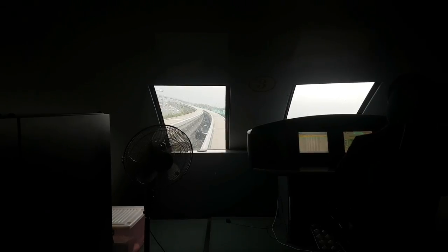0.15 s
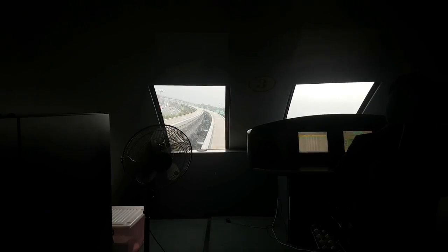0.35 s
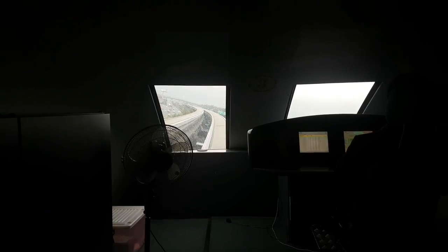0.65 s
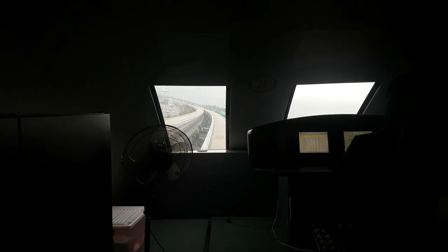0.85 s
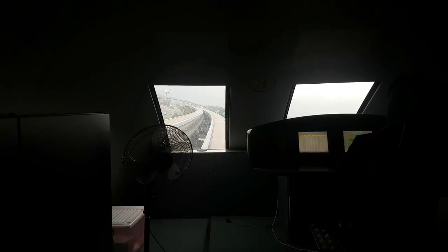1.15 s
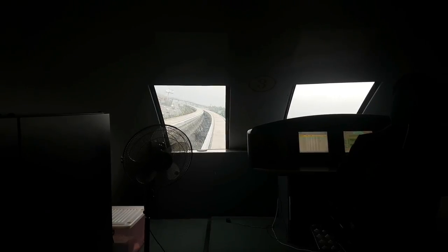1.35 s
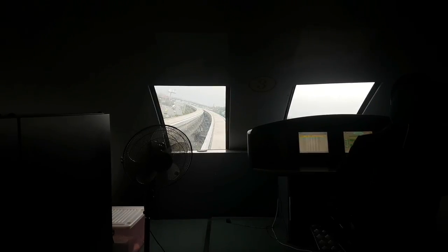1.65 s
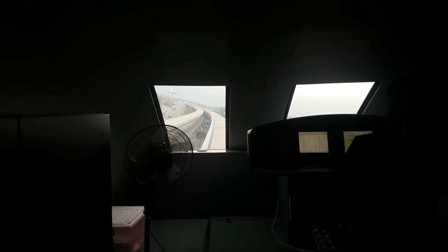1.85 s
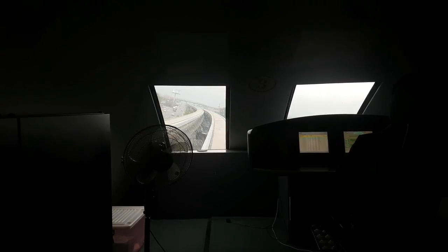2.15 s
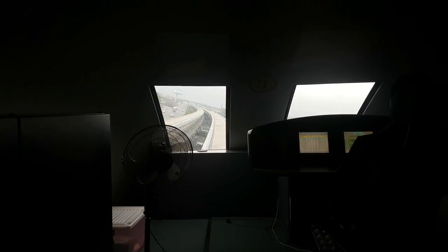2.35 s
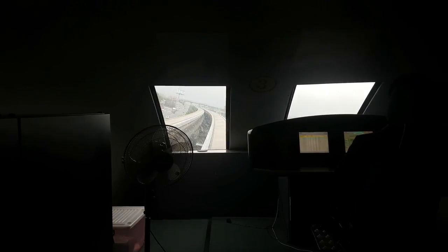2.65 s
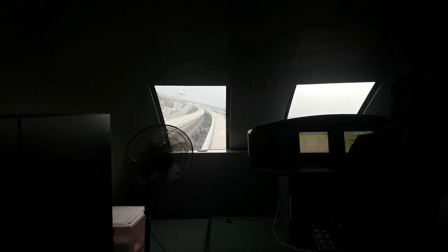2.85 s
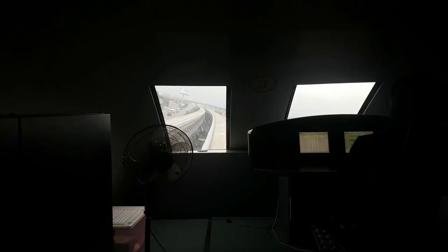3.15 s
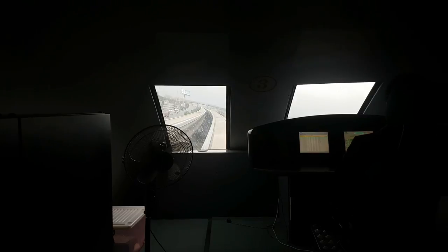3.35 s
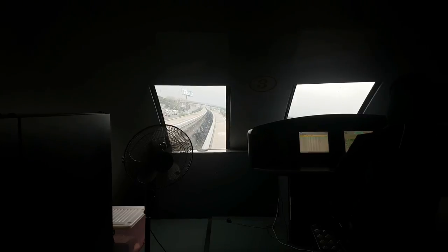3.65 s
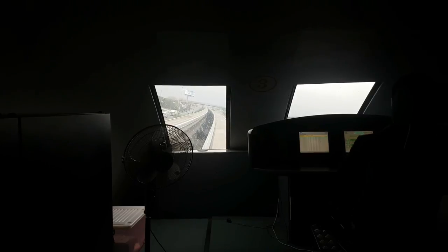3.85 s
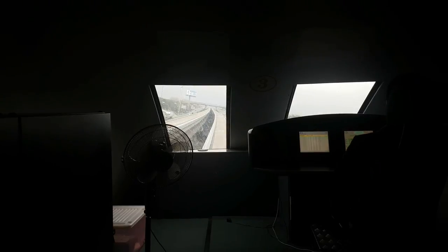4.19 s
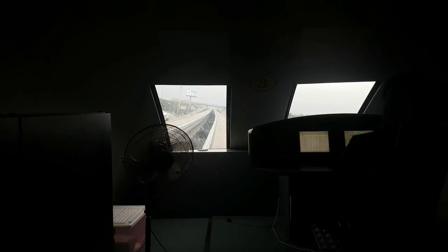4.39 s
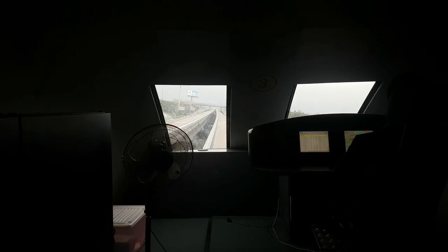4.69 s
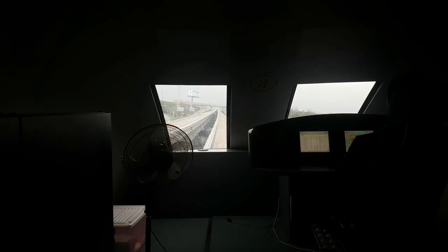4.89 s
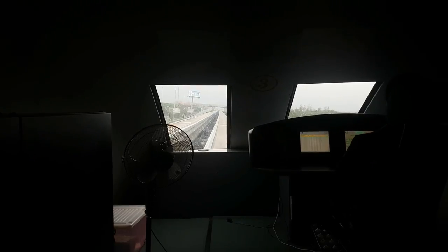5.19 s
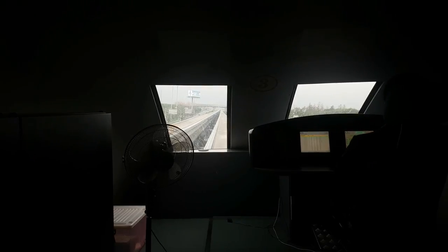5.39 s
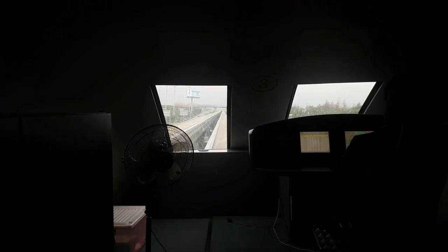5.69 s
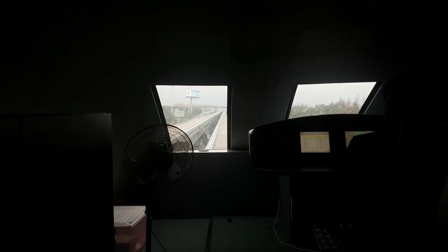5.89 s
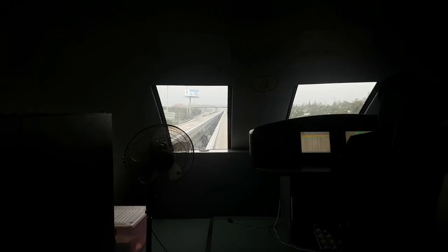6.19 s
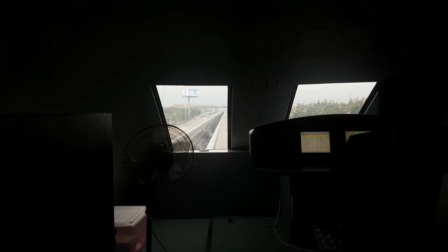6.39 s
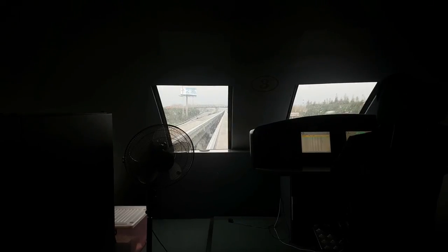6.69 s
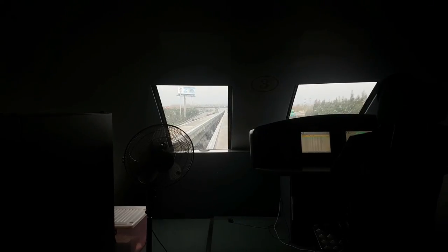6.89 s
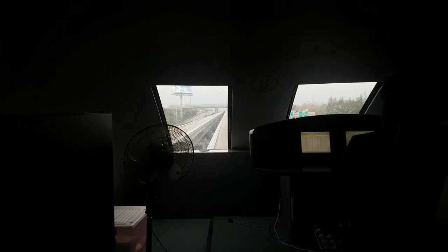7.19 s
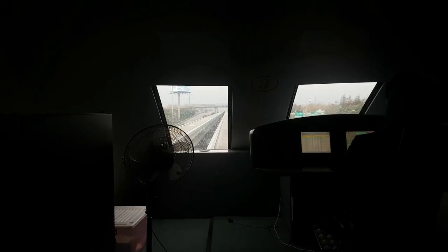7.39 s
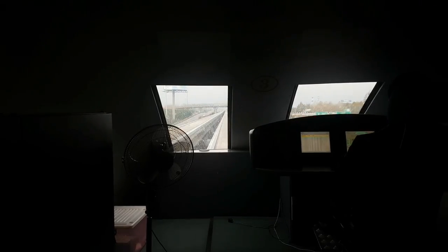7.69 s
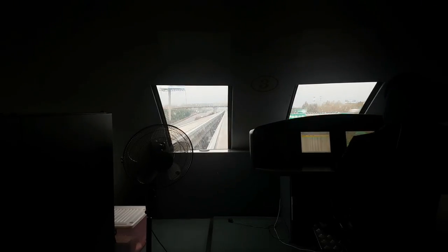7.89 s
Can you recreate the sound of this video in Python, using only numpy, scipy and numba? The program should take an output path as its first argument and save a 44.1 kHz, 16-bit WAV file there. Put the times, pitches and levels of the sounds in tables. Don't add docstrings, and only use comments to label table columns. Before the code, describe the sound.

Inside a high-speed train's driver cab, a deep booming roar sways with gusts while airy hiss and a thin tonal whine come and go.

```python
import sys
import numpy as np
from scipy import signal
from scipy.fft import rfft, irfft, next_fast_len
from scipy.io import wavfile
from scipy.ndimage import uniform_filter1d
from numba import njit

SR = 44100
rng = np.random.default_rng(int(sys.argv[2]) if len(sys.argv) > 2 else 0)


def generate_wav(sig):
    pcm = np.round(np.clip(np.atleast_2d(sig).T, -1, 1) * 32767).astype(np.int16)
    wavfile.write(sys.argv[1], SR, pcm)


def gain_from_decibels(decibels):
    exponent = np.asarray(decibels, float) / 20
    return 10 ** exponent


N = 354563
TIME = np.arange(N) / SR
SIZE = next_fast_len(N)
HZ = np.maximum(np.arange(SIZE // 2 + 1) * SR / SIZE, 1)


def shape(points, beyond=None):
    hz, value = np.transpose(points)
    return np.interp(np.log(HZ), np.log(hz), value, beyond, beyond)


def walk(rate_hz):
    k = int(SR / rate_hz)
    steps = np.repeat(rng.standard_normal(N // k + 1), k)
    return 0.72 * uniform_filter1d(uniform_filter1d(steps, k), k)[:N]


def bumps(centre_s, length_s, height):
    return height @ np.exp(-(2 * (TIME - centre_s[:, None]) / length_s[:, None]) ** 2)


def body(cab):
    # f/Hz, density/dB per Hz
    boom_colour = [(18, -27), (44, -17), (73, -10.5), (89, -2.5), (130, -3), (200, -3.5), (250, -5.5),
                   (290, -8), (330, -15), (420, -30), (700, -70)]
    # f/Hz, density/dB per Hz
    panel_colour = [(150, -48), (220, -26.5), (320, -1.5), (450, -2), (600, -6.5), (800, -11.5),
                    (1000, -16.5), (1400, -56), (2500, -73.5)]
    # f/Hz, likeness/0-1
    alike = [(25, .95), (60, .96), (130, .985), (215, .98), (300, .93), (390, .6), (480, .6), (560, .4),
             (650, .2), (800, .1), (1200, 0)]
    likeness = shape(alike)
    gust_db, shake_db = sway()
    slots_per_beam, joint_db, joint_turns = 288, 0.2, 0.33
    beams = np.cumsum(slot_hz()) / SR / slots_per_beam
    throb_db = joint_db * np.cos(2 * np.pi * (beams - joint_turns))
    boom_db = -15 + shake_db + throb_db
    panel_db = -23.5 + 0.97 * gust_db + 0.9 * walk(7) + 0.37 * walk(4.9)
    booms = field(boom_colour, likeness, 0.18, cab) * gain_from_decibels(boom_db)
    panels = field(panel_colour, likeness, 0.11, cab) * gain_from_decibels(panel_db)
    return booms + panels


def air(cab):
    # f/Hz, density/dB per Hz
    rush_colour = [(300, -50), (500, -20), (800, -6), (1080, -.6), (1500, -1.2), (2100, -3.6), (2540, -5),
                   (2690, -7.3), (3500, -8.6), (4000, -11.7), (4300, -15.5), (5500, -22.5), (8000, -33.5),
                   (9000, -48)]
    # f/Hz, density/dB per Hz
    leak_colour = [(5000, -40.5), (7000, -21.5), (9000, -5.5), (10000, -7), (12500, -4), (14000, -5),
                   (14400, -3), (14850, -0.5), (15400, -4), (17000, -6.5)]
    # f/Hz, likeness/0-1, left lag/rad
    sideways = [(400, .5, .9), (900, .5, 2.4), (1150, .5, 2.9), (1420, .64, 3.2), (1700, .4, 3.8),
                (2410, .42, 5.6), (2840, .3, 8.8), (3100, .26, 9.3), (3800, .22, 12), (4500, .15, 16.5),
                (6000, .12, 22.5), (16000, .05, 40)]
    # centre/s, length/s, leak lift/dB
    puffs = [
        (3.85, .4, 1.5),
        (7.62, .3, 3),
    ]
    hz, likeness, lag_rad = np.transpose(sideways)
    likeness = shape(np.transpose([hz, likeness]))
    lag_rad = shape(np.transpose([hz, lag_rad]))
    gust_db = sway()[0]
    flutter_db = 0.7 * walk(14) + 0.8 * walk(10)
    rush_db = -31 + gust_db + 0.6 * walk(25) + flutter_db
    leak_db = -68 + 1.1 * gust_db + bumps(*np.transpose(puffs)) + 0.9 * walk(30) + flutter_db
    out = field(leak_colour, likeness, lag_rad, cab) * gain_from_decibels(leak_db)
    rush = rfft(field(rush_colour, likeness, lag_rad, cab), SIZE)
    above_1700 = 1 / (1 + (1700 / HZ) ** 6)
    above_3600 = 1 / (1 + (3600 / HZ) ** 6)
    for band in (1 - above_1700, above_1700 - above_3600, above_3600):
        out = out + irfft(rush * band, SIZE)[:, :N] * gain_from_decibels(rush_db + 0.5 * walk(13))
    return out


def whine():
    # centre/s, length/s, level/dB, left minus right/dB, left lead/rad
    swells = [
        (.5, 1.2, -40, -2, .6),
        (1.55, .8, -45.5, 4, .5),
        (3.1, .5, -51, 8, 1.4),
        (4.62, .85, -40, 3, .1),
        (5.6, .6, -44, 2, .1),
        (6.15, .35, -43, 3, .1),
        (7.0, .5, -45, 2, 1.0),
        (7.65, .9, -39.5, -1, 2.8),
    ]
    centre_s, length_s, level_db, pan_db, lead_rad = np.transpose(swells)
    swell = gain_from_decibels(-52) + bumps(centre_s, length_s, gain_from_decibels(level_db))
    pan_db = np.interp(TIME, centre_s, pan_db)
    lead_rad = np.interp(TIME, centre_s, lead_rad)
    phase = 2 * np.pi * np.cumsum(slot_hz() + 3.5 * walk(12)) / SR
    flicker_db = 3 * np.array([walk(8), walk(8)])
    port_gain = gain_from_decibels(np.array([pan_db, -pan_db]) / 2 + flicker_db)
    return np.sqrt(2) * swell * port_gain * np.sin(phase + np.array([lead_rad, 0 * lead_rad]))


def ticks():
    # t/s, peak/dB
    creaks = [
        (6.7695, -42),
        (4.95, -47),
        (3.21, -48),
        (6.3, -48),
        (3.98, -47),
    ]
    swell = 0
    for start_s, peak_db in creaks:
        decay = np.exp(-np.maximum(TIME - start_s, 0) / 0.015)
        swell = swell + gain_from_decibels(peak_db) * decay * (TIME >= start_s)
    band = signal.butter(4, [9500, 14500], "band", fs=SR, output="sos")
    return 0.5 * swell * signal.sosfilt(band, rng.standard_normal((2, N)))


def sway():
    # centre/s, length/s, air lift/dB, boom lift/dB
    sways = [(.6, 0.76, 1.5, 2.5), (1.3, 0.22, -0.5, 1), (1.797, 0.87, 2, 2.5), (2.198, .3, -0.3, 1),
             (2.9, 0.64, 0.5, 0), (3.3, 0.34, 1, 2.5), (3.52, 0.22, 2.5, 3), (3.95, .25, 0.5, -0.5),
             (4.598, 0.41, 3, 2.5), (4.93, 0.15, 2, 1.5), (5.75, 0.26, 1, 1.5), (6.2, 0.55, 1.5, 1),
             (6.6, .3, 0.5, 2.5), (6.88, .4, 2, 1), (7.297, .4, 0.5, 1.5), (7.65, 0.62, 2, 1.5),
             (7.85, 0.1, -0.5, 3)]
    centre_s, length_s, air_db, boom_db = np.transpose(sways)
    gust_db = 0.1535 * TIME + bumps(centre_s, length_s, air_db)
    shake_db = 0.19 * TIME + bumps(centre_s, length_s, boom_db)
    return gust_db, shake_db


def slot_hz():
    # t/s, f/Hz
    slot_rate = [(0, 1001), (2, 1011), (4.5, 1016), (6.2, 1026), (8.04, 1040)]
    return np.interp(TIME, *np.transpose(slot_rate))


def field(colour, likeness, lag_rad, cab):
    shared, own = np.exp(2j * np.pi * rng.random((2, len(HZ))))
    left = likeness * shared * np.exp(-1j * lag_rad) + np.sqrt(1 - likeness ** 2) * own
    spectrum = np.array([left, shared]) * gain_from_decibels(shape(colour, beyond=-150) + cab)
    pair = irfft(spectrum, SIZE)[:, :N]
    return pair / np.sqrt(np.mean(pair.mean(axis=0) ** 2))


def cab_db():
    # f/Hz, width/Hz, level/dB
    low_modes = [(31, 8, 10), (63, 9, 4.5), (75, 8, -1.5), (108, 16, 4.5), (131, 10, -2.5), (147, 13, 7),
                 (160, 8, -1.5), (172, 12, 3), (185, 8, -1.5), (197, 11, 5.5), (209, 9, -4), (228, 11, 8.5),
                 (262, 8, -1.5), (271, 10, 3.5), (299, 10, 3), (315, 8, 2), (327, 10, -4), (353, 18, 3.5),
                 (396, 10, 3), (410, 12, -3), (433, 8, 2), (444, 8, -3), (503, 8, 2.5), (518, 14, -2.5),
                 (555, 10, -2)]
    # f/Hz, width/Hz, left/dB, right/dB
    high_modes = [(333, 14, -1.5, -2.0), (382, 40, 0.0, -4.5), (441, 24, 2.0, 1.5), (495, 40, -1.0, 2.0),
                  (570, 14, 2.0, -0.5), (608, 14, -1.0, 2.5), (672, 24, 0.5, -2.0), (942, 70, -2.0, -2.5),
                  (1076, 24, -0.5, 2.5), (1141, 40, -1.5, -1.5), (1195, 24, 2.0, -1.0),
                  (1335, 24, -2.0, 0.0), (1437, 24, 1.0, 2.5), (1491, 40, 1.0, -1.0), (1614, 40, -2.0, 1.0),
                  (1684, 40, -0.5, -2.0), (1765, 40, 2.5, 1.0), (1841, 40, -2.0, 0.0),
                  (1948, 40, 1.5, -0.5), (2266, 40, -1.5, 1.5), (2320, 40, -2.0, -1.5),
                  (2384, 40, 1.5, -1.5), (2460, 70, 1.0, 1.5), (2718, 70, -1.0, -0.5), (3628, 70, 0.0, 1.5),
                  (3762, 70, 1.0, -1.5)]
    # f/Hz, left minus right/dB
    ports = [(30, .6), (60, -.8), (200, -1.2), (360, .5), (550, -2), (800, -3.2), (1400, -3.5),
             (2000, -2.7), (3500, -3.6), (4900, -6.5), (6200, -2.8), (8200, -3.6), (11500, 3.4),
             (15000, -.3)]

    def bell(hz, width_hz):
        return 1 / (1 + (2 * (HZ - hz) / width_hz) ** 2)

    low_db = sum(db * bell(hz, width) for hz, width, db in low_modes)
    high_db = sum(np.array([[left], [right]]) * bell(hz, width) for hz, width, left, right in high_modes)
    crowd = uniform_filter1d(uniform_filter1d(rng.standard_normal((2, len(HZ))), 120), 120)
    ripple_db = 0.9 * crowd / crowd.std() * (HZ > 500)
    port_db = shape(ports) * np.array([[0.5], [-0.5]])
    return low_db + 1.25 * high_db + ripple_db + port_db


def scene():
    cab = cab_db()
    return body(cab) + air(cab) + whine() + ticks()


@njit
def follow(x, attack, release):
    out, e = np.empty(len(x)), .3
    for i in range(len(x)):
        e += (x[i] - e) * (attack if x[i] > e else release)
        out[i] = e
    return out


def roll_off(x):
    return signal.sosfilt(signal.butter(12, 16380, fs=SR, output="sos"), x)


def record(dry):
    attack_s, release_s, ahead = 0.0039, 0.017, 100
    fade_in_s, fade_out_s = 0.013, 0.002
    loud = follow(np.abs(dry).max(axis=0), 1 / (attack_s * SR), 1 / (release_s * SR))
    gain = (0.5 / np.maximum(loud, 0.3)) ** 0.35
    gain = uniform_filter1d(uniform_filter1d(gain, 200), 200)
    gain = np.append(gain[ahead:], np.full(ahead, gain[-1]))
    fade_in = np.minimum(0.5 + TIME / fade_in_s / 2, 1)
    held = dry * gain * gain_from_decibels(0.71) * fade_in
    rounded = held / (1 + (np.abs(held) / 1.05) ** 6) ** (1 / 6)
    low_pass = signal.ellip(12, 0.1, 45, 15745, fs=SR, output="sos")
    mix = signal.sosfiltfilt(low_pass, rounded)
    mix = mix * np.minimum((TIME[-1] - TIME) / fade_out_s, 1)
    return roll_off(mix)


dry = scene()
out = record(dry)
generate_wav(out)
```